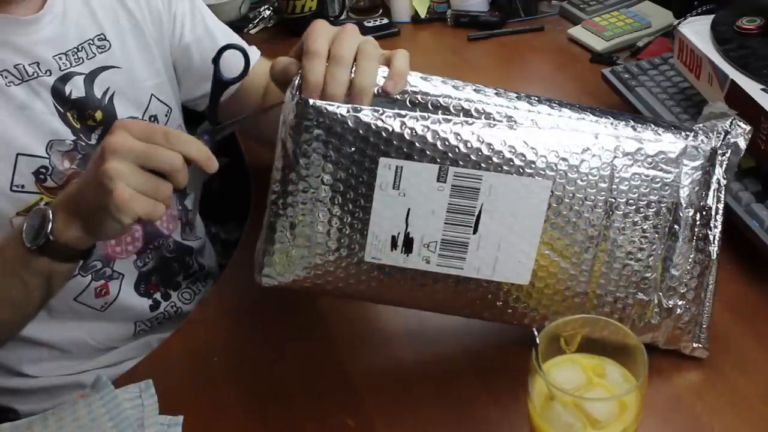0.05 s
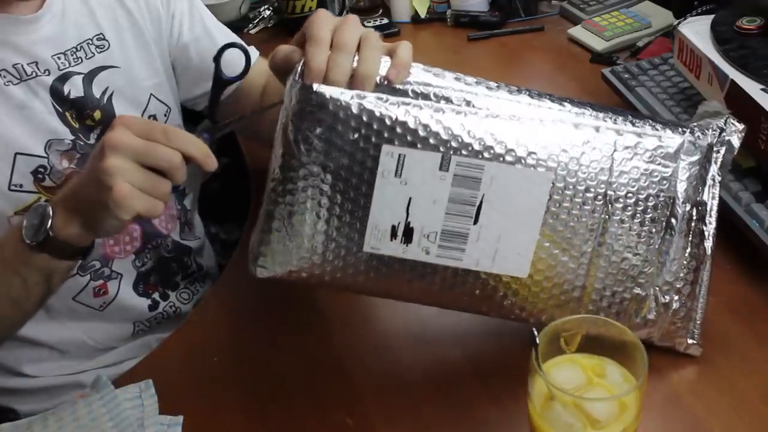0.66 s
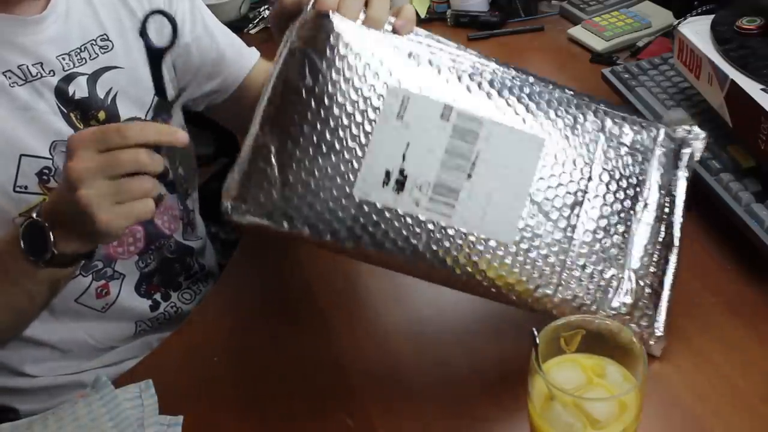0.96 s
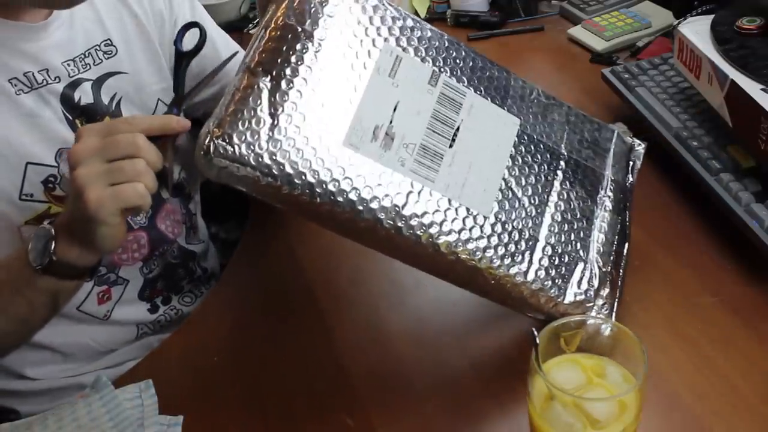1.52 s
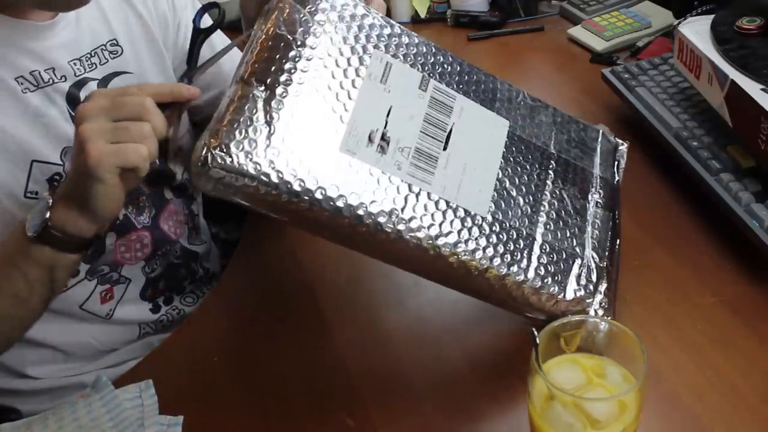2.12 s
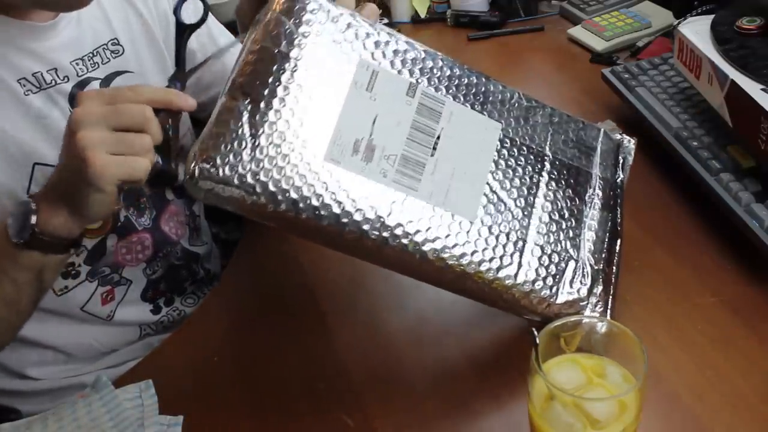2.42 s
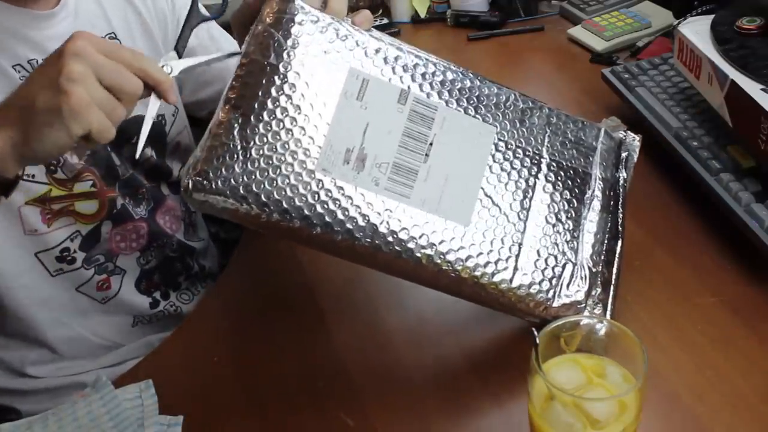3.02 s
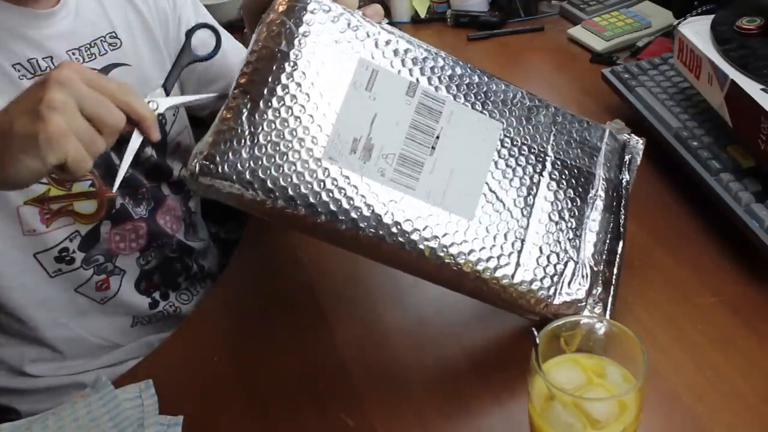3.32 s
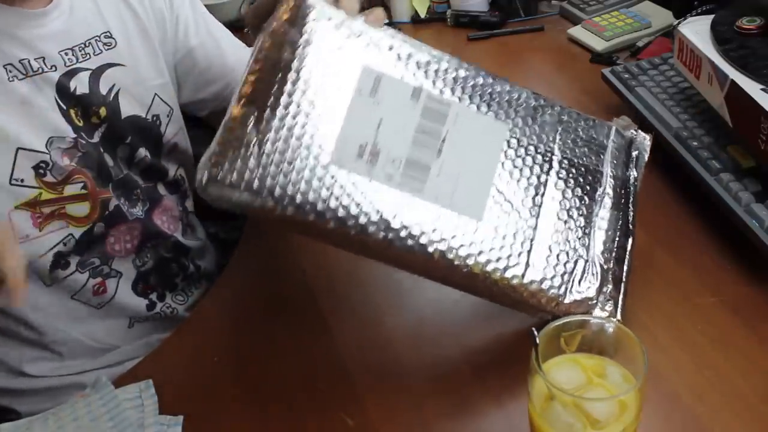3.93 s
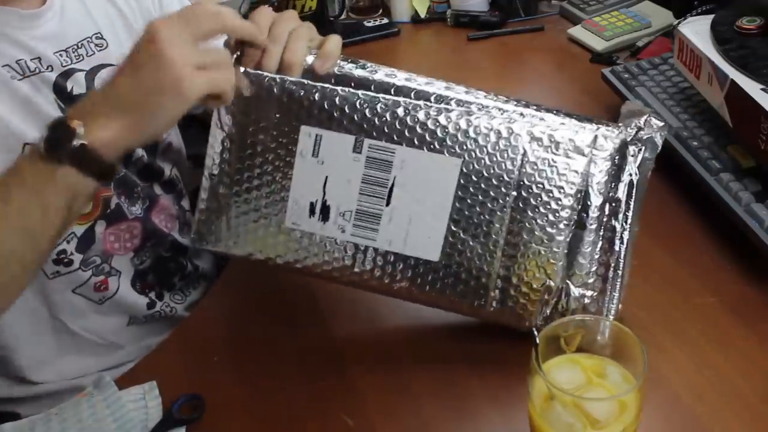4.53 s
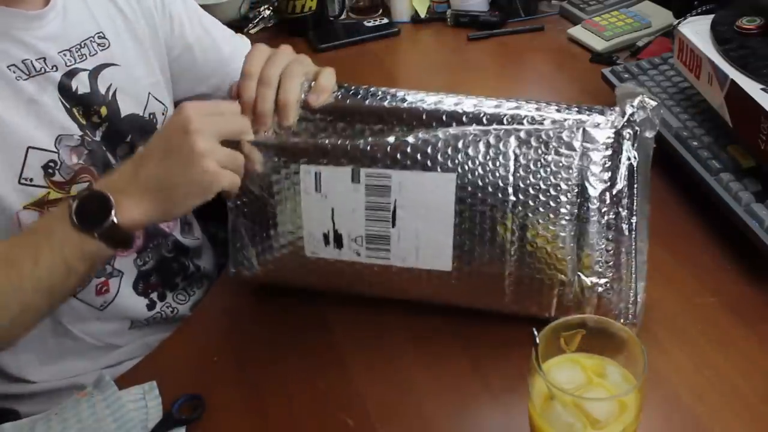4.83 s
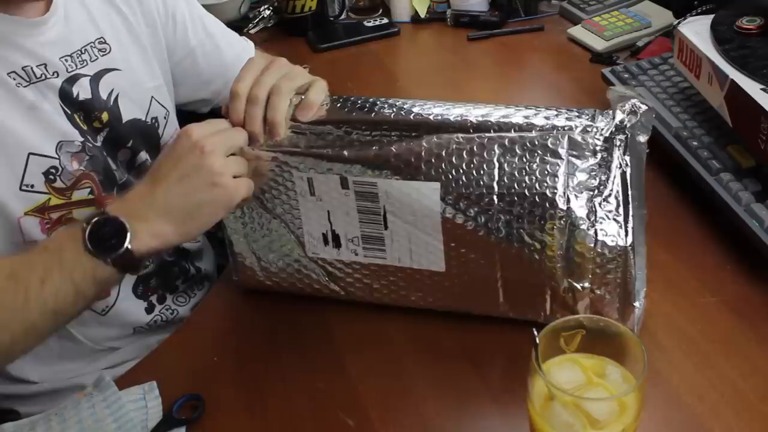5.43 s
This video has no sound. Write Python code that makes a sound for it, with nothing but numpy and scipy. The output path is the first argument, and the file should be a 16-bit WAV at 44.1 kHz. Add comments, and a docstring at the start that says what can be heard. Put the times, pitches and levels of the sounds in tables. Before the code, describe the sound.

A foil bubble mailer gives a couple of sharp snaps at about 0.4 seconds, then slides with a soft, fluttering hiss from 0.7 to 1.4 seconds as it is lifted. A quiet stretch holds only faint ticks, then soft bumps around 2.6 seconds. At 2.9 seconds scissors snip shut with a brief steel ring. More bites follow with fine crackle, hollow crunching of the padding and tiny bright rips, loudest between 3.6 and 4 seconds, where the bag gives short ringing pops. At about 4.2 seconds the scissors land on the desk with a few quick knocks, a clink and a low boom. From 4.6 seconds to the end at about 5.6, fingers pull at the opening with lighter crinkling and soft thuds. From 3 seconds on, slow puffs of air rumble at the microphone. The small room has a faint hum and hiss.

```python
"""A desk in a small room: a foil bubble mailer slides as it is lifted, scissors snip through its edge
and are put down with a clink, then fingers pull at the opening. Creases buckle in sharp snaps and fine
crackle, the padding crunches, and the bag's air pocket or a taut foil panel rings briefly after a bite
or tap. The steel blades ring and the desk booms. The moving bag pushes slow puffs of air at the
microphone over faint hum and hiss."""
import sys
import numpy as np
from scipy import signal
from scipy.fft import rfft, irfft, next_fast_len
from scipy.io import wavfile
from scipy.ndimage import uniform_filter1d

SR = 44100
rng = np.random.default_rng(int(sys.argv[2]) if len(sys.argv) > 2 else 0)


def unload_audio(sound):
    """Save the sound as a 16-bit wav file, at the path given as the first command line argument."""
    columns = np.transpose(np.atleast_2d(sound))
    # keep every value between -1 and 1, then stretch to whole-number steps
    steps = np.round(np.clip(columns, -1, 1) * 32767)
    wavfile.write(sys.argv[1], SR, steps.astype(np.int16))


N = 245176
TIME = np.arange(N) / SR
RMS_WINDOW_S = .004  # for the levels of blows and bumps

# scissors meeting the desk: start_s, level_db, bright_db, chatter_ms, ring_db, boom_db
KNOCKS = [(4.16, -35.5, -7, 0.84, -86, -67), (4.2289, -37, -10, 6.4, -65, -33.5),
          (4.244, -49.5, -4.5, 38, -61, -58), (4.2904, -36, 6, 2.4, -34.5, -56),
          (4.354, -47, -5, 1.6, -53.5, -48), (4.4528, -55, -8, 1, -66.5, -80)]


def snaps():
    """Creases buckle and blades bite through, coloured by the padded bag."""
    # start_s, level_db, bright_db, chatter_ms
    bites = [(0.094, -56.5, -2.5, 3.9), (0.3375, -42.5, -11.5, 2.3), (0.402, -34, -0.5, 1.54),
             (0.449, -50.5, 5, 1.6), (0.806, -58.5, 2.5, 2.3), (1.382, -58, 4.5, 1.5), (1.4195, -64, 12, 2),
             (1.797, -85, 18, 1.2), (1.816, -69.5, 3, 0.81), (1.971, -68.5, 6, 1.5), (1.983, -76, 9, 1),
             (1.997, -68.5, 2, 3), (2.039, -70.5, -3, 6.4), (2.076, -71.5, -7, 0.82), (2.179, -82, 17, 2.3),
             (2.364, -67.5, 10, 3), (2.548, -52.5, -9, 5.4), (2.685, -56, -3.5, 4.5),
             (2.7272, -38, -3, 1.45), (2.875, -28.5, 1.5, 1.5), (2.9245, -42, 3.5, 2.4),
             (2.9838, -57.5, 12, 1.7), (3.034, -58, 9, 3.2), (3.129, -48.5, 7.5, 6.6),
             (3.156, -46, -0.5, 4.1), (3.164, -38.5, -5, 2.4), (3.255, -35.5, -4, 4.9),
             (3.324, -39.5, -12, 3.4), (3.374, -39.5, -8, 3.2), (3.411, -44, -9, 2.8),
             (3.466, -43.5, -20, 2.9), (3.5365, -57, 1, 1.7), (3.6015, -29.5, -4, 0.77),
             (3.647, -36.5, -1.5, 3), (3.681, -35, -21, 5.3), (3.7062, -25, -2.5, 1.2),
             (3.7095, -35, -8, 0.97), (3.7143, -25.5, -21, 1), (3.725, -35, -3, 1.2),
             (3.753, -36.5, -0.5, 3.8), (3.771, -26, -9.5, 2), (3.898, -36.5, -37, 1.1),
             (3.906, -32, -2.5, 1.4), (3.915, -33, -1.5, 0.6), (3.922, -34.5, 2, 1.3),
             (3.9425, -36.5, 0, 2.4), (3.945, -27.5, -12, 1.5), (4.497, -84, 19.5, 2),
             (4.539, -53, -2, 2.7), (4.6055, -73, 21, 2.8), (4.752, -46.5, 3, 4.1), (4.922, -50, 0, 4.3),
             (4.989, -77, 27, 4.1), (5.094, -68.5, 16.5, 1.4), (5.111, -60, 10, 1.4),
             (5.187, -57, 6.5, 1.8), (5.2745, -55, 8.5, 1.9), (5.308, -72, 19, 0.93),
             (5.3324, -52.5, 8, 0.61), (5.385, -43.5, 0, 0.24), (5.549, -59, 15.5, 0.5)]
    # bag spectrum: freq_hz, gain_db
    bag = [(100, -5), (230, -3.5), (370, -5.5), (620, -6), (800, 0), (1150, 4.5), (1420, 7.5), (1700, 3.5),
           (2600, 0.5), (3300, -3.5), (4000, -5.5), (5500, -6.5), (8000, -11.5), (10500, -15), (13000, -15),
           (16000, -23)]
    return blows(bites, bag, room_db=-6.5, spots=3)


def scissors(snip_s=2.875, snip_db=-37):
    """The blades snip shut, choked by the hand; later they knock on the desk and ring freely."""
    desk_hz_db = [(140, 10), (400, 2), (700, 1), (1200, 15), (2000, 3.5), (3200, -7), (5600, -10.5),
                  (8000, -7.5), (11000, -12), (16000, -28)]
    out = blows(KNOCKS, desk_hz_db, room_db=-9.5, spots=1)
    free_ring = blade_ring(t60_s=0.231)
    for start_s, *_, ring_db, _ in KNOCKS:
        add(out, start_s, amp(ring_db) * free_ring)
    treble = signal.butter(3, [6100, 21000], "band", fs=SR, output="sos")
    add(out, snip_s, amp(snip_db) * signal.sosfilt(treble, blade_ring(t60_s=0.1235)))
    return out


def blade_ring(t60_s, size=12000, modes=280):
    """Blades, rivet and handles ring in many close modes with one decay rate."""
    # mode strengths: freq_hz, gain_db
    steel = [(950, 0), (1200, -4.5), (1900, 7.5), (2400, -15), (4200, 5), (4850, -9), (5350, 8), (5900, 3),
             (6600, -6), (8000, -9), (12000, -23)]
    t = np.arange(size) / SR
    offset, phase = rng.random((2, modes, 1))
    hz = 900 + 11000 * (np.arange(modes)[:, None] + offset) / modes
    partials = amp(read(steel, hz)) * np.sin(2 * np.pi * (hz * t + phase))
    return unit(partials.sum(0)) * amp(-60 * t / t60_s)


def blows(rows, colour, room_db, spots, size=4096):
    """Each blow is one sudden give, then chatter as the material settles; the room answers."""
    shapes = registers(colour)
    direct, room_feeds = np.zeros(N), np.zeros((spots, N))
    for k, (start_s, level_db, bright_db, chatter_ms, *_) in enumerate(rows):
        thud_db = -11 + 3.5 * np.log2(chatter_ms)  # a slower give pushes more thud
        fizz_db = -10.5 + 1.7 * bright_db
        gains = amp(level_db + np.array([0, thud_db, bright_db, fizz_db])) * np.sqrt(RMS_WINDOW_S * SR)
        age = np.arange(size) / SR * 1000 / chatter_ms
        settling = unit(rng.standard_normal(size) * age * np.exp(-2 * age)) / np.sqrt(size)
        force = signal.unit_impulse(size) + chatter_ms * settling
        register_rms = np.sqrt(np.mean(abs(shapes * rfft(force)) ** 2, axis=1))
        add(direct, start_s, signal.fftconvolve(force, causal(gains / register_rms @ shapes)))
        # the room hears all sides, so the chatter evens out
        add(room_feeds[k % spots], start_s, causal(gains @ shapes))
    return direct + amp(room_db) * sum(reverb(feed) for feed in room_feeds)


def rustle(rubbing=0.56):
    """Crackle over the smooth rubbing of the film, following the flexing of the foil."""
    # foil spectrum: freq_hz, gain_db
    foil = [(100, 1), (300, -15), (600, -13.5), (1500, -6.5), (2400, -7.5), (3500, -8), (7000, -12.5),
            (12000, -18), (16000, -18)]
    creases = crackle(rate_hz=3200, spread_db=4.2, clump_db=3.5, cycles=1.6, pitches=20)
    drive = creases + rubbing * rng.standard_normal(N)
    kernels = [np.fft.fftshift(irfft(shape)) for shape in registers(foil)]
    middle, low, high, top = (unit(signal.oaconvolve(drive, kernel, "same")) for kernel in kernels)
    level, body, fizz = flexing()
    return amp(-1) * (level * middle + body * low + np.sqrt(level * fizz) * high) + amp(-4) * fizz * top


def flexing():
    """Hands flex the foil: gains over time of its middle, body and fizz."""
    # peak_s, hold_s, level_db, bright_db
    flexes = [(0.088, 0.049, -68, -14), (0.355, 0.12, -63.5, -15), (0.49, 0.045, -66.5, -12),
              (1.53, 0.019, -72.5, 0), (1.634, 0.87, -83.5, -1.5), (2.472, 0.17, -75, -1.5),
              (2.731, 0.12, -69, -5.5), (3.082, 0.025, -59, -4), (3.163, 0.013, -47.5, -14),
              (3.244, 0.19, -52, -11), (3.654, 0.21, -51.5, -6.5), (3.88, 0.015, -54, -4.5),
              (4.007, 0.1, -66, 0.5), (4.618, 0.025, -63.5, 0), (4.734, 0.029, -49.5, 0.5),
              (4.814, 0.15, -58.5, 2.5), (5.016, 0.18, -59, 2), (5.343, 0.15, -62.5, 5),
              (5.547, .03, -51.5, 3)]
    power = np.zeros((3, N))
    for peak_s, hold_s, level_db, bright_db in flexes:
        body_db = -9.5 - 0.018 * bright_db  # a dull flex moves the padding more
        power += np.outer(amp([0, body_db, bright_db]), gesture(peak_s, hold_s, level_db)) ** 2
    return np.sqrt(power)


def ticks(gain_db=-12):
    """Small creases tick while the foil is flexed."""
    colour = response([(300, -22), (1400, -11), (3000, -12), (6000, 0), (12000, -41)])
    creases = crackle(rate_hz=380, spread_db=2.2, clump_db=2, cycles=2.2)
    fizz = flexing()[2]
    return amp(gain_db) * fizz * unit(convolve(creases, colour))


def padding():
    """Squeezed bubbles slip past each other: a low, hollow crunch."""
    # peak_s, hold_s, level_db
    squeezes = [(3.173, 0.03, -52.5), (3.27, 0.16, -62.5), (3.662, 0.075, -53), (3.716, 0.011, -47),
                (4.691, 0.056, -59), (5.55, .01, -54.5)]
    colour = response([(60, -35), (130, 7.5), (170, 6), (235, 7.5), (300, -16.5), (380, -2.5),
                       (520, -9), (1000, -18), (4000, -57)])
    slips = crackle(rate_hz=1200, spread_db=3, clump_db=3, cycles=0.71, pitches=4)
    return unit(convolve(slips, colour)) * sum(gesture(*row) for row in squeezes)


def rip():
    """The blade tip parts the taut film: runs of tiny, very bright clicks."""
    # peak_s, level_db, swell_db_per_s
    rips = [(3.173, -39.5, 222), (3.714, -38, 1402), (3.773, -42, 2201)]
    colour = response([(1000, -29), (6000, -14), (10000, -7), (13000, -6), (16000, -6)])
    clicks = crackle(rate_hz=660, spread_db=2.5, clump_db=6.5, cycles=0.63)
    envelope = sum(gesture(peak_s, 0, db, swell, release_db_per_s=802) for peak_s, db, swell in rips)
    return unit(convolve(clicks, colour)) * envelope


def bag_rings(waver=0.064, sag_octaves_per_s=11, size=8000):
    """The bag's air pocket or a taut foil panel rings briefly after a bite or tap."""
    # start_s, pitch_hz, level_db, t60_s
    notes = [(0.337, 3150, -35.5, 0.0067), (0.402, 435, -38, 0.025), (1.083, 345, -59, 0.026),
             (1.107, 332, -44.5, 0.011), (2.876, 215, -38, 0.076), (3.253, 190, -31, 0.012),
             (3.28, 300, -36.5, 0.03), (3.323, 210, -34, 0.031), (3.354, 200, -40, 0.02),
             (3.371, 326, -32.5, 0.025), (3.602, 1000, -12, 0.011), (3.6001, 1350, -30.5, 0.027),
             (3.606, 1522, -29.5, 0.079), (3.645, 1396, -20.5, 0.037), (3.71, 1346, -30, 0.035),
             (3.941, 381, -25, 0.021), (3.944, 2540, -18.5, 0.0069)]
    out, t = np.zeros(N), np.arange(size) / SR
    for start_s, pitch_hz, level_db, t60_s in notes:
        wobble = unit(uniform_filter1d(rng.standard_normal(size), size=70))
        hz = pitch_hz * 2 ** (-sag_octaves_per_s * t) * (1 + waver * wobble)  # film slackens, crumples
        add(out, start_s, amp(level_db - 60 * t / t60_s) * np.sin(2 * np.pi * np.cumsum(hz) / SR))
    return out


def slide():
    """Fluttering friction of the foil: the rub grows slowly with speed, hiss faster, the airy top last."""
    # bag motion: time_s, speed_db
    motion = [(0.63, -99), (0.68, -27.5), (0.78, -24), (0.86, -9.5), (1.08, -5.5), (1.165, -2),
              (1.225, -2.5), (1.28, -8.5), (1.41, -15.5), (1.5, -92), (4.7, -110), (5.1, -42), (5.56, -30)]
    # friction spectra: freq_hz, gain_db
    rub_spectrum = [(150, -7), (217, -15), (297, -7), (540, -10), (759, 3), (1260, 4), (1520, 8), (1800, 4),
                    (2310, 6.5), (3400, -4), (4410, 0), (12700, -21), (16000, -44)]
    hiss_spectrum = [(4000, -5), (7000, -1), (8600, 1), (11200, -2), (12600, -3), (14000, -9), (16000, -8)]
    airy_spectrum = [(10500, -25), (12500, 2), (13200, -3), (14400, -8), (15500, -7), (16200, -22)]
    speed = follow(motion)
    flutter = flicker(depth_db=1.2, step_s=.004)
    airy = amp(-50) * noise(airy_spectrum) * speed ** 3.8
    rub = amp(-56) * noise(rub_spectrum) * speed ** 0.33
    hiss = amp(-54) * noise(hiss_spectrum) * speed
    return flutter * (rub + hiss + airy)


def bumps():
    """Soft, heavy contacts of bag, hands and desk: one short push of bass each."""
    # start_s, level_db
    contacts = [(0.673, -57), (1.099, -54), (1.206, -50), (2.55, -47.5), (2.727, -49), (3.353, -56),
                (4.229, -42.5), (4.626, -45), (4.715, -40.5), (4.756, -36.5), (4.904, -49)]
    push = response([(40, -12), (70, -8.5), (110, -9.5), (165, -14.5), (220, -19.5), (400, -25),
                     (1000, -54), (4000, -94)])
    push *= np.sqrt(RMS_WINDOW_S * SR) / np.linalg.norm(push)
    out = np.zeros(N)
    for start_s, level_db in contacts:
        add(out, start_s, amp(level_db) * push)
    return out


def desk_boom(t60_s=0.66):
    """The desk top rumbles on after each knock of the scissors."""
    envelope, t = np.zeros(N), np.arange(SR) / SR
    for start_s, *_, boom_db in KNOCKS:
        add(envelope, start_s, amp(boom_db - 60 * t / t60_s))
    return envelope * noise([(40, 3.5), (75, -14), (105, -6), (160, -12), (230, -30), (400, -33),
                             (1000, -39), (4000, -85)])


def air_puffs(gain_db=1):
    """Bag and arms push air at the microphone: a slow, deep rumble."""
    # time_s, relative_db
    puffs = [(0.0, -70), (0.08, -62), (1.84, -61.5), (3.08, -52), (3.41, -43.5), (3.53, -52.5),
             (3.78, -38.5), (3.89, -51), (4.03, -37), (4.07, -43), (4.33, -40.5), (5.03, -48.5),
             (5.06, -44), (5.56, -41.5)]
    # freq_hz, gain_db
    air_spectrum = [(10, 4), (25, -3), (44, -2.5), (55, -14), (100, -36), (200, -69), (400, -94)]
    return amp(gain_db) * noise(air_spectrum) * follow(puffs)


def reverb(sound, first_s=0.0019, reflections_per_s=6000, size=18000):
    """Dense, short-lived reflections of the small room; each call is a new spot in it."""
    # reflected spectrum: freq_hz, gain_db
    walls = [(100, 6), (400, 0.5), (800, 1), (1400, -6.5), (2400, -5.5), (5000, -5.5), (12000, -4.5)]
    # freq_hz, t60_s
    decay = [(100, 0.15), (500, 0.089), (1500, 0.2), (5000, 0.24), (10000, 0.22), (16000, 0.24)]
    taps = rng.standard_normal(size) * (rng.random(size) < reflections_per_s / SR)
    taps *= np.arange(size) / SR > first_s
    hz, frame_s, frames = signal.stft(taps, SR, nperseg=256)
    gain_db = read(walls, hz)[:, None] - 60 * frame_s / read(decay, hz)[:, None]
    tail = signal.istft(frames * amp(gain_db), SR, nperseg=256)[1]
    return convolve(sound, tail / np.linalg.norm(tail))


def room_tone():
    """A soft, blurred hum and the hiss of a quiet room."""
    # noise floor: freq_hz, gain_db
    floor_spectrum = [(47, -40), (80, -1.5), (190, -7), (242, -3), (296, -10), (643, -20.5), (751, -14),
                      (980, -24.5), (1530, -32), (2430, -33.5), (15000, -26.5)]
    hum = noise([(70, -50), (88, -10), (94, 0), (101, -10), (125, -50), (1000, -90)])
    return amp(-72) * hum + amp(-73) * noise(floor_spectrum)


def crackle(rate_hz, spread_db, clump_db, cycles, pitches=12):
    """Tiny creases give way in clumps, mostly faint; each rings briefly at one of several pitches."""
    surge = flicker(clump_db, step_s=.012)
    chance, strength, pitch_index = rng.random(N), rng.exponential(1, N), rng.integers(0, pitches, N)
    at = np.flatnonzero(chance < rate_hz / SR * surge / surge.mean())
    heights = amp(spread_db * np.minimum(strength[at], 4)) * np.sqrt(surge[at]) * (-1.) ** at
    out = np.zeros(N)
    for k, hz in enumerate(np.geomspace(300, 14000, pitches)):
        angle, radius = 2 * np.pi * hz / SR, np.exp(-hz / SR / cycles)
        clicks = np.bincount(at, heights * (pitch_index[at] == k), N)
        out += signal.lfilter([hz, 0, -hz], [1, -2 * radius * np.cos(angle), radius ** 2], clicks)
    return unit(out)


def gesture(peak_s, hold_s, level_db, swell_db_per_s=220, release_db_per_s=225):
    """Gain over time of one hand move: swell, hold, release."""
    before_s, after_s = np.maximum(peak_s - TIME, 0), np.maximum(TIME - peak_s - hold_s, 0)
    return amp(level_db - swell_db_per_s * before_s - release_db_per_s * after_s)


def flicker(depth_db, step_s):
    """Randomly wandering gain."""
    knots_s = np.arange(0, N / SR, step_s)
    return amp(depth_db * np.interp(TIME, knots_s, rng.standard_normal(len(knots_s))))


def follow(curve):
    """Gain from (time_s, db) points, silent outside them."""
    time_s, db = np.transpose(curve)
    return amp(np.interp(TIME, time_s, db, left=-200, right=-200))


def registers(spectrum, size=4096, order=7):
    """Split a spectrum into four gain curves of rms 1."""
    # middle, low, high, top: from_hz, to_hz
    edges = [(650, 2100), (110, 650), (2100, 7000), (7000, 17000)]
    hz = np.fft.rfftfreq(size, 1 / SR) + 1
    gain = amp(read(spectrum, hz))
    return np.array([unit(gain / (1 + (lo / hz) ** order) / (1 + (hz / hi) ** order))
                     for lo, hi in edges])


def noise(spectrum):
    """Steady noise of rms 1 from (freq_hz, gain_db) points."""
    size = next_fast_len(N, real=True)
    gain = amp(read(spectrum, np.fft.rfftfreq(size, 1 / SR)))
    return unit(irfft(rfft(rng.standard_normal(size)) * gain, size)[:N])


def response(spectrum, size=4096):
    """Impulse response from (freq_hz, gain_db) points."""
    return causal(amp(read(spectrum, np.fft.rfftfreq(size, 1 / SR))))


def causal(gain):
    """Minimum-phase impulse response of a gain curve."""
    log_gain = np.log(np.concatenate([gain, gain[-2:0:-1]]) + gain.max() * 1e-5)
    return np.fft.ifft(np.exp(np.conj(signal.hilbert(log_gain)))).real[:len(gain) - 1]


def read(points, hz):
    """Interpolate (freq_hz, value) points over log frequency."""
    freq_hz, value = np.transpose(points)
    return np.interp(np.log(hz + 1), np.log(freq_hz + 1), value)


def convolve(sound, impulse):
    return signal.oaconvolve(sound, impulse)[:N]


def add(mix, start_s, sound):
    part = mix[max(round(start_s * SR), 0):][:len(sound)]
    part += sound[:len(part)]


def amp(db):
    return 10 ** (np.asarray(db) / 20)


def unit(x):
    return x / np.sqrt(np.mean(x ** 2) + 1e-30)


def scene(room_db=-9):
    """Snaps, knocks and soft handling sounds in one room, mono."""
    handling = rustle() + padding() + ticks() + slide() + bumps() + bag_rings() + rip()
    impacts = snaps() + scissors() + desk_boom()
    return (impacts + handling + amp(room_db) * reverb(handling) + air_puffs() + room_tone())[None]


def record(dry):
    """Steep low-pass at 16150 Hz."""
    lowpass = signal.firwin(401, 16150, window=("kaiser", 7), fs=SR)
    return signal.oaconvolve(dry, lowpass[None], "same")


dry = scene()
out = record(dry)
unload_audio(out)
```